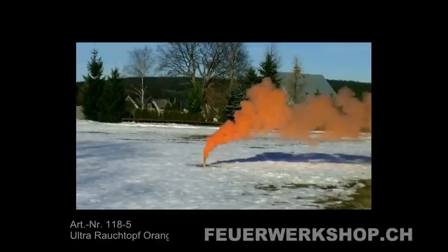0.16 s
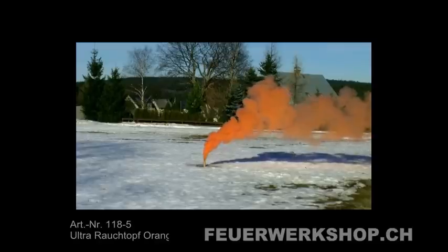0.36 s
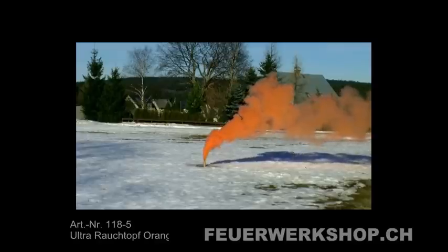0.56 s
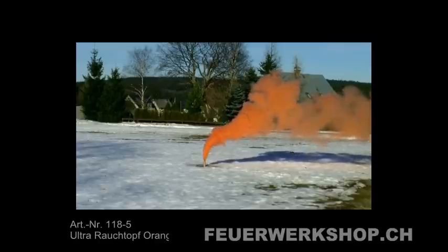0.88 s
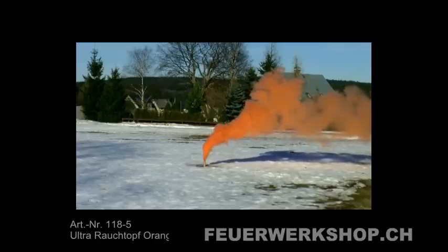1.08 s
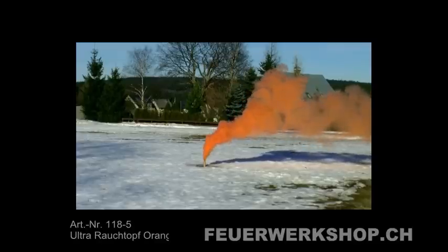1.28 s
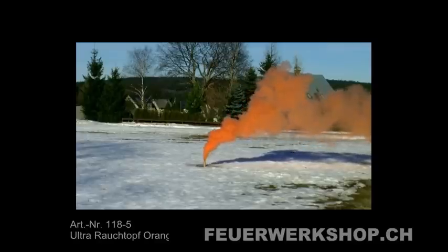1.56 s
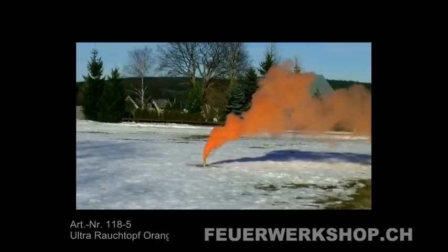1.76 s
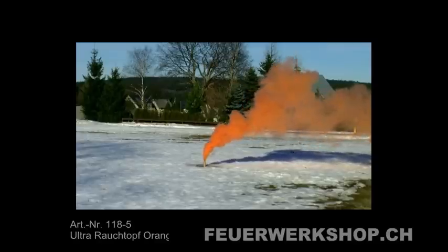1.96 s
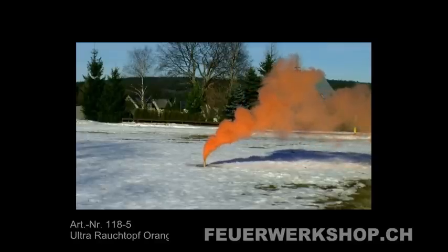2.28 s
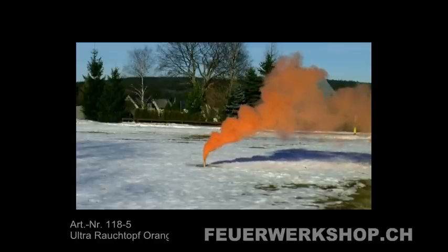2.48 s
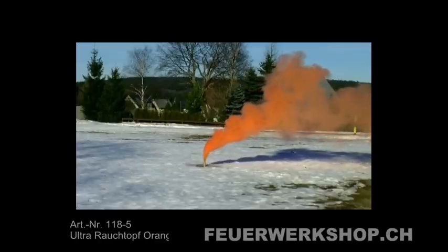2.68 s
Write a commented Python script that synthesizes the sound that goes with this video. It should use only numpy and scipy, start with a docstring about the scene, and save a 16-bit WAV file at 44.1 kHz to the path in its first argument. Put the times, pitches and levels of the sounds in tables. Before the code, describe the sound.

An orange smoke pot roars and hisses steadily outdoors, with dense fine crackling and sharp snaps

```python
"""The main source is a smoke pot burning on a snowy field, some metres left of a camcorder's microphone.
Its gas jet is a low roar and a hiss, both coloured noise whose bands flicker. Around it are crackles and small
grains (short noise bursts), dull pops and one fluttering sputter (puffs of noise ringing in the can).
A very short inverted bounce doubles the hiss, grains and crackles. At the microphone a motor hums faintly."""
import sys
import numpy as np
from scipy import signal
from scipy.fft import rfft, irfft
from scipy.io import wavfile
from scipy.ndimage import uniform_filter1d, map_coordinates

SR = 44100
rng = np.random.default_rng(int(sys.argv[2]) if len(sys.argv) > 2 else 0)


def digitize_waveform(pressure):
    """Quantize a signal to 16-bit integers and store it at the path in sys.argv[1].

    Rows of a 2-D input are taken as channels; values are limited to [-1, 1].
    """
    field = np.atleast_2d(pressure).T
    bounded = np.clip(field, -1, 1)
    quanta = np.round(bounded * 32767).astype(np.int16)
    wavfile.write(sys.argv[1], SR, quanta)


def volts(x):
    """Linear amplitude factor 10**(x/20) for a level x in dB, scalar or array-like."""
    e = np.asarray(x, float) / 20
    return 10 ** e


N = 125244

# spectrum of the gas jet's roar, relative: pitch_hz, level_db (per Hz)
ROAR_SPECTRUM = [(15, -63), (25, -42.5), (299, -7.5), (399, -7.5), (464, -5), (584, -2), (643, -4.5),
                 (1060, -4.5), (1600, -10), (2060, -16), (2400, -15), (3120, -22), (5280, -120)]
# loudness of the roar: time_s, level_db (rms)
ROAR_LOUDNESS = [(0, -43.5), (1, -43.5), (2.05, -42.5), (2.25, -41.5), (2.6, -41.5), (2.72, -43),
                 (2.84, -44)]
# spectrum of the burning charge's hiss, relative: pitch_hz, level_db (per Hz)
HISS_SPECTRUM = [(900, -7.5), (1800, -1.5), (3100, 4), (4400, -2), (7000, -3.5), (11000, -8.5), (14000, -4)]
# loudness of the hiss: time_s, level_db (rms)
HISS_LOUDNESS = [(0, -49), (.06, -47), (.2, -47), (.255, -49.5), (.27, -41), (.33, -46.5), (.42, -46.5),
                 (.49, -45), (.6, -47), (.76, -46), (.9, -48), (1.2, -44.5), (1.27, -43.5), (1.45, -46.5),
                 (1.6, -48), (1.85, -50), (1.89, -45), (1.98, -46), (2.08, -46.5), (2.35, -47.5),
                 (2.6, -46.5), (2.84, -48)]
# sharp crackles: time_s, peak_db, low_band_db, high_band_db (shares),
# balance_db (level difference of the two channels, not the place of the source)
CRACKLE_EVENTS = [(0.0237, -27, -14, -7, -4), (0.0545, -28, -12, -10, -2), (0.2478, -16.5, -22, -18, -1),
                  (0.2593, -23.5, -3, -14, -1), (0.2635, -20, -9, -4, -2), (0.3128, -23.5, 4, -21, -2),
                  (0.3219, -32, -16, -7, -3), (0.345, -23, -2, -5, 7.0), (0.4589, -35, -13, 1, 6.5),
                  (0.4762, -23, -11, -8, 6.5), (0.4873, -26, 19, -24, 7.0), (0.628, -27, -13, -3, -2),
                  (0.8055, -16, -13, -21, -1), (0.8225, -24, -1, -8, 4), (0.8396, -27, -12, -10, -1),
                  (0.8609, -29, -14, -14, 6.5), (0.8674, -32, -5, -22, 9), (0.9577, -24.5, -12, -5, 10),
                  (1.1657, -26.5, -18, -10, -3), (1.254, -26.5, -12, -18, 9), (1.261, -23, -11, -6, 4),
                  (1.2921, -17, -15.5, -42, -3), (1.3265, -32, -15, -20, -5), (1.335, -22.5, -20, 3, -4),
                  (1.4118, -27, -8.5, -9, 9), (1.4699, -17.5, -4.5, -39, 7), (1.4787, -24, -13, 0, 9),
                  (1.4824, -34, -10, -21, 7.0), (1.5054, -29, -11, -10, 8), (1.511, -30, -10, -4, 7),
                  (1.5648, -23, -17, -38, 8), (1.574, -28, -19, 1, 6.5), (1.5883, -22.5, -28, 0, 7),
                  (1.666, -34, -22, -17, 9), (1.884, -20, -8, -2, -2), (2.0955, -23.5, -7, -1, -3),
                  (2.1628, -9, -13, -8.5, 0.5), (2.296, -20.5, -16, -14, -1), (2.578, -28, -16, -2.5, 6),
                  (2.605, -24.5, -8, -7, 8)]
# low, middle and high band of crackles and grains: low_edge_hz, high_edge_hz
SNAP_BANDS = [(2000, 4300), (4300, 8200), (8200, 12000)]
# dull pops: start_s, peak_db, pitch_hz
POP_EVENTS = [(0.0939, -28.5, 2740), (0.0975, -26.5, 2530), (0.3148, -29, 2720), (0.447, -33, 3250),
              (0.8602, -32.5, 3270), (1.071, -28, 2720), (1.189, -26, 3160), (1.2173, -30, 3300),
              (1.2919, -27.5, 2840), (1.4709, -28.5, 3070), (1.8551, -31, 3100), (2.087, -32, 2920),
              (2.1015, -29.5, 2700), (2.124, -28, 1610), (2.139, -34, 2660), (2.4012, -22.5, 2140),
              (2.413, -36, 1640), (2.4361, -26.5, 1590), (2.467, -27, 1720), (2.4887, -32.5, 2680),
              (2.5107, -27.5, 1640), (2.529, -33.5, 2040), (2.803, -32, 2950)]
# course of the fluttering sputter: time_s, rate_puffs_per_s, peak_db
SPUTTER_COURSE = [(2.1704, 69, -28.5), (2.255, 69, -29.5), (2.275, 80, -29), (2.345, 84, -29.5),
                  (2.365, 66, -29), (2.39, 62, -28)]
# resonances of the can: pitch_hz, width_hz, level_db (relative)
CAN_RESONANCES = [(800, 700, -2), (1650, 800, 1), (3100, 800, 3)]
# hum lines of the camcorder's motor: multiple (of its base pitch), level_db (rms)
MOTOR_LINES = [(4, -63), (5, -55), (8, -58.5)]

LEFT_DB = 6.5  # the pot's side: left over right
SNAP_DECAY_S = 0.00016  # decay of a grain; a crackle's snap has half of it


def band(x, lo_hz, hi_hz):
    """Band-pass between two edges."""
    return signal.sosfilt(signal.butter(2, [lo_hz, hi_hz], "band", fs=SR, output="sos"), x)


def ring(x, hz, width_hz):
    """One resonance."""
    return signal.lfilter(*signal.iirpeak(hz, hz / width_hz, fs=SR), x)


def curve(table):
    """Second column of a table, joined by straight lines in time."""
    table = np.array(table)
    return np.interp(np.arange(N) / SR, table[:, 0], table[:, 1])


def walk(rate_hz):
    """Slow random wander: levels held for 1 / rate_hz and smoothed twice."""
    hold = int(SR / rate_hz)
    steps = np.repeat(rng.standard_normal(N // hold + 1), hold)
    return 1.28 * uniform_filter1d(uniform_filter1d(steps, hold), hold)[:N]


def coloured(spectrum, shared_db, own_db, rate_hz):
    """Noise in half-octave bands that flicker together and, twice as fast, each alone; rms 1."""
    spectrum = np.array(spectrum)
    hz = np.maximum(np.fft.rfftfreq(N, 1 / SR), 1)
    shape_db = np.interp(np.log(hz), np.log(spectrum[:, 0]), spectrum[:, 1])
    noise = rfft(rng.standard_normal(N)) * volts(shape_db)
    out, shared = 0, walk(rate_hz)
    for half_octave in np.arange(8, 29):
        weight = np.clip(1 - abs(2 * np.log2(hz) - half_octave), 0, 1)
        flicker_db = shared_db * shared + own_db * walk(rate_hz * 2)
        out = out + irfft(noise * weight, N) * volts(flicker_db)
    return out / np.sqrt(np.mean(out ** 2))


def pan(x, left_db):
    """Two channels, the left louder than the right by left_db."""
    gains = volts(np.array([[left_db], [-left_db]]) / 2)
    return gains / gains.mean() * x


def add(out, start_s, grain, peak_db, balance_db=None):
    """Lay a grain with the given peak at start_s, in two channels if balance_db is given."""
    i = int(start_s * SR)
    grain = grain[:N - i] * volts(peak_db) / np.max(abs(grain))
    out[..., i:i + len(grain)] += grain if balance_db is None else pan(grain, balance_db)


def burst(decay_s, size=2500):
    """A puff of noise that rises quickly and dies away."""
    t = np.arange(size) / SR
    return rng.standard_normal(size) * t / decay_s * np.exp(-t / decay_s)


def can(x):
    """The can's resonances, kept between its two edges and cut steeply above the upper one."""
    low_edge_hz, high_edge_hz = 350, 3600
    rung = 0
    for k, (hz, width_hz, db) in enumerate(CAN_RESONANCES):
        rung = rung + (-1) ** k * volts(db) * ring(x, hz, width_hz)
    steep = signal.butter(6, high_edge_hz, fs=SR, output="sos")
    return signal.sosfilt(steep, band(rung, low_edge_hz, high_edge_hz))


def roar():
    """Roar of the gas jet: low noise whose bands flicker slightly, mostly each alone."""
    return coloured(ROAR_SPECTRUM, 0.16, 0.71, 5.85) * volts(curve(ROAR_LOUDNESS))


def hiss():
    """Hiss of the burning charge: bright noise that flickers faster and deeper than the roar."""
    return coloured(HISS_SPECTRUM, 0.96, 1.7, 15) * volts(curve(HISS_LOUDNESS))


def crackle(peak_db, shares_db):
    """A sharp snap followed by a short hiss and a longer fizz, coloured in three bands."""
    softer_db_per_db = 0.64  # weaker crackles hold more hiss and fizz against the snap
    sound = volts(-25) * burst(0.003 / 2) + volts(-32.5) * burst(0.008 / 2)  # hiss and fizz
    sound = sound * volts(-softer_db_per_db * peak_db)
    i = int(0.0007 * SR)  # a trace of noise is heard just before the snap
    sound[i:] += burst(SNAP_DECAY_S / 2)[:-i] / 2
    sound[i] += 2
    low, mid, high = (volts(db) * band(sound, lo, hi) / np.sqrt(hi - lo)
                      for db, (lo, hi) in zip(shares_db, SNAP_BANDS))
    return low - mid + high  # alternating signs join the bands without gaps


def crackles():
    """The loud crackles, each with its own colour and channel balance."""
    offset_s, mid_band_db = 0.0007, -7  # offset_s is added to every table time
    out = np.zeros((2, N))
    for time_s, peak_db, low_db, high_db, balance_db in CRACKLE_EVENTS:
        sound = crackle(peak_db, (low_db, mid_band_db, high_db))
        add(out, time_s + offset_s, sound, peak_db, balance_db)
    return out


def grains():
    """A patchy rain of small crackles: random impulses of uneven size, in bands of randomly varied level."""
    median_per_s, smallest_db = 900, -45.5  # impulse size before colouring
    hit = rng.random(N) < median_per_s / SR * volts(4 * walk(12))
    size = hit * volts(smallest_db + 2 * 1.8 * np.minimum(rng.exponential(size=N), 3))
    out = 0
    for share_db, (lo_hz, hi_hz) in zip((-2, -1, -5), SNAP_BANDS):
        impulses = size * volts(share_db + 7.2 * rng.standard_normal(N))
        snaps = signal.fftconvolve(impulses, burst(SNAP_DECAY_S, size=200))[:N]
        out = out + band(snaps, lo_hz, hi_hz)
    return out


def pops():
    """Dull pops: a puff ringing broadly at its own pitch and in the can."""
    width_hz = 1000
    out = np.zeros(N)
    for start_s, peak_db, pitch_hz in POP_EVENTS:
        puff = burst(0.0019 / 2)
        own_ring = ring(ring(puff, pitch_hz, width_hz), pitch_hz, width_hz)
        add(out, start_s, own_ring + can(puff) / 2, peak_db)
    return out


def sputter():
    """Gas puffs at a quick, slightly uneven rate, ringing in the can."""
    jitter_s, spread_db = 0.0003, 1.0
    out = np.zeros(N)
    time_s, rate, level_db = np.array(SPUTTER_COURSE).T
    s = time_s[0]
    while s < time_s[-1]:
        peak_db = np.interp(s, time_s, level_db) + spread_db * rng.standard_normal()
        puff = can(burst(0.0024 / 2) + burst(SNAP_DECAY_S))
        add(out, s + jitter_s * rng.standard_normal(), puff, peak_db)
        s += 1 / np.interp(s, time_s, rate)
    return out


def motor():
    """The camcorder's motor: steady hum lines whose levels waver a little."""
    base_hz, waver_db = 117.4, 0.4
    t = np.arange(N) / SR
    out = np.zeros(N)
    for multiple, level_db in MOTOR_LINES:
        level = np.sqrt(2) * volts(level_db + waver_db * walk(3.3))
        out += level * np.sin(2 * np.pi * (multiple * base_hz * t + rng.random()))
    return out


def bounce(x):
    """A weaker inverted copy arriving just behind the direct sound."""
    delay_s, level_db = 0.000479, -13.5
    at = np.arange(N) - delay_s * SR
    late = np.array([map_coordinates(side, [at], mode="nearest") for side in x])
    return -volts(level_db) * late


def diffuse():
    """Separate roar and hiss, opposite in sign on the two sides, so heard without a direction."""
    low = roar()
    mixed = volts(-3) * low + hiss() + volts(-8.0) * band(low, 20, 200)
    return volts(-15.5) * mixed * np.array([[1], [-1]])


def scene():
    """The pot left of centre: bright sounds with their bounce, low sounds and hum without it, diffuse gas."""
    bright = pan(hiss() + grains(), LEFT_DB) + crackles()
    low = pan(roar() + pops() + sputter() + motor(), LEFT_DB)
    return low + bright + bounce(bright) + diffuse()


def roll_off(x):
    """The treble ends steeply here."""
    return signal.sosfilt(signal.butter(12, 15080, fs=SR, output="sos"), x)


def record(dry):
    """The recorder's treble roll-off near top_hz, on a top band already set lower from weak_from_hz."""
    weak_from_hz, top_hz, weak_db = 12100, 14100, -17
    hz = np.fft.rfftfreq(N, 1 / SR)
    corners_hz = [weak_from_hz, weak_from_hz + 600, top_hz - 700, top_hz, top_hz + 1200]
    treble_db = np.interp(hz, corners_hz, [0, weak_db, weak_db, -30, -50])
    mix = irfft(rfft(dry) * volts(treble_db), N)
    return roll_off(mix)


dry = scene()
out = record(dry)
digitize_waveform(out)
```